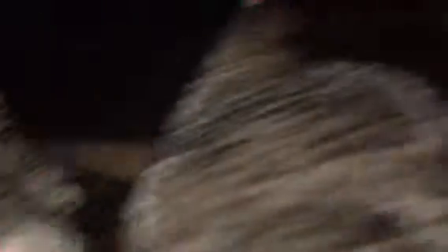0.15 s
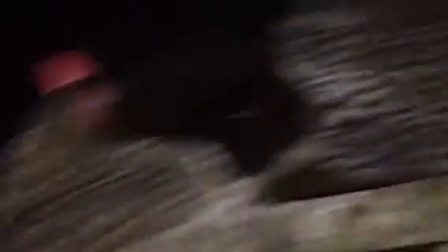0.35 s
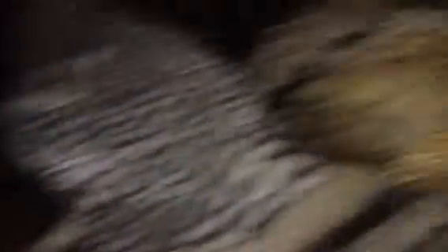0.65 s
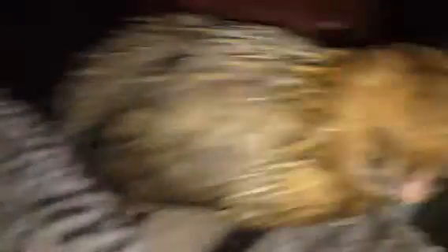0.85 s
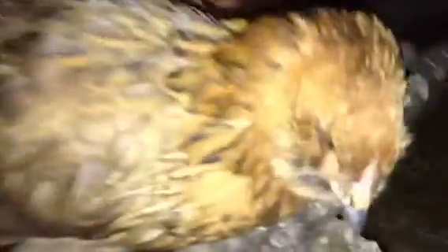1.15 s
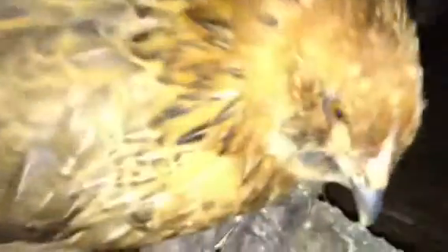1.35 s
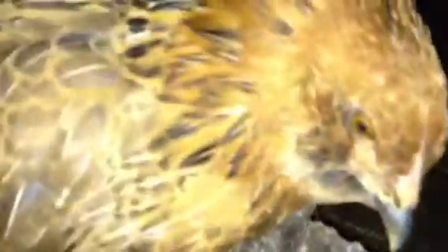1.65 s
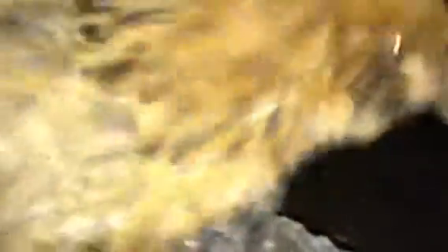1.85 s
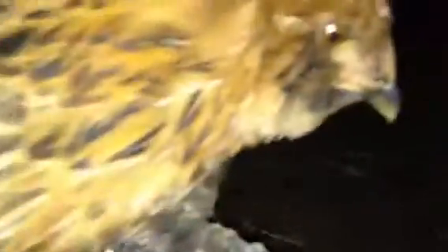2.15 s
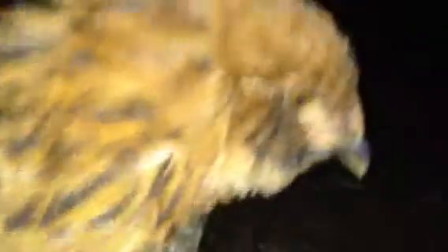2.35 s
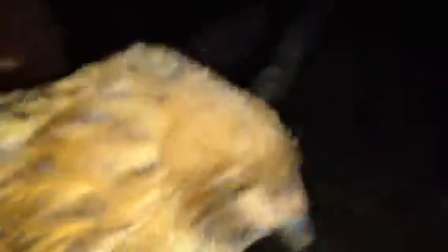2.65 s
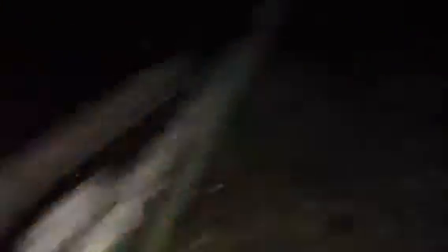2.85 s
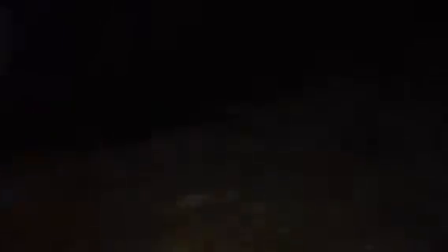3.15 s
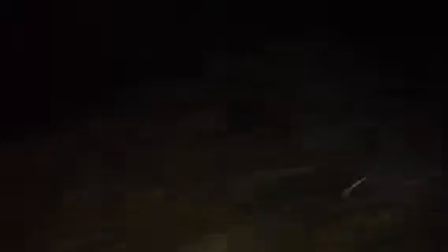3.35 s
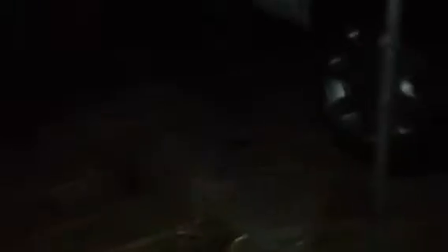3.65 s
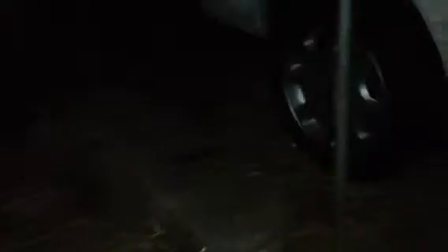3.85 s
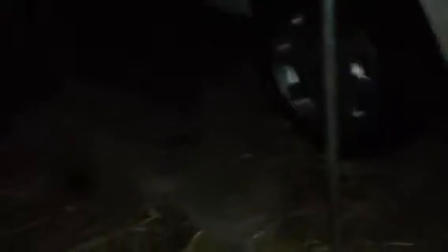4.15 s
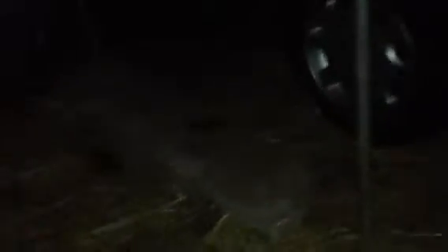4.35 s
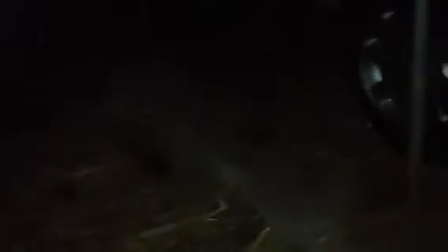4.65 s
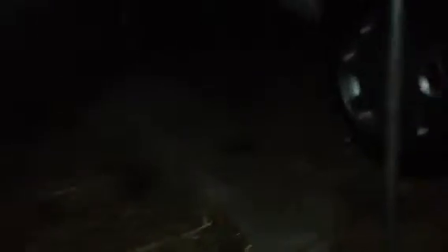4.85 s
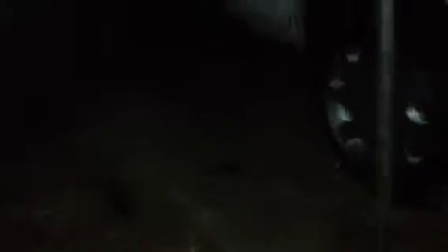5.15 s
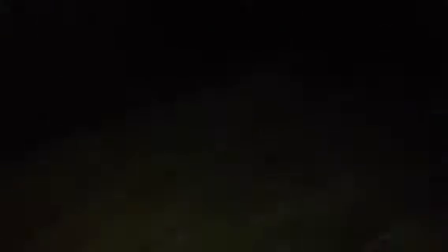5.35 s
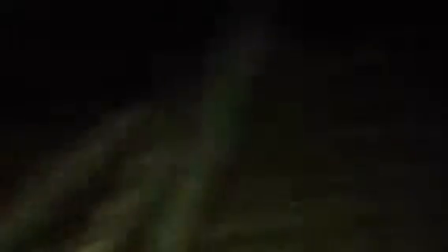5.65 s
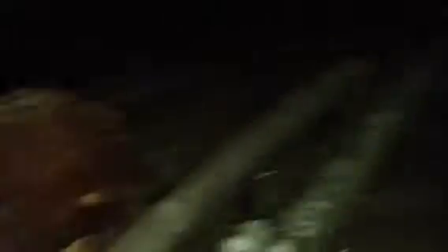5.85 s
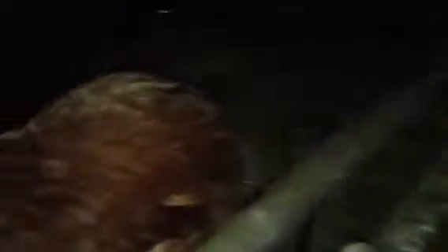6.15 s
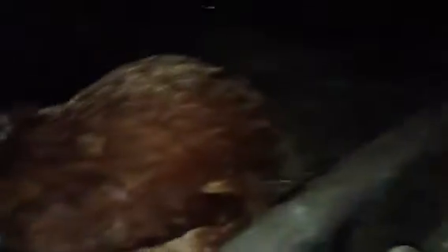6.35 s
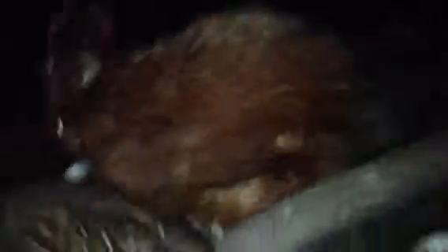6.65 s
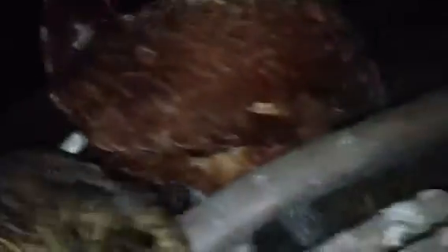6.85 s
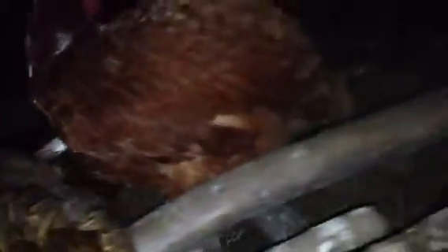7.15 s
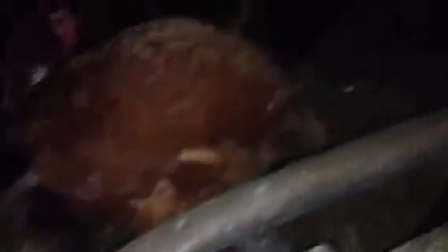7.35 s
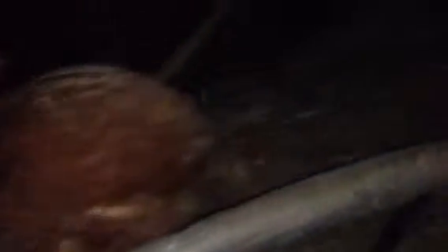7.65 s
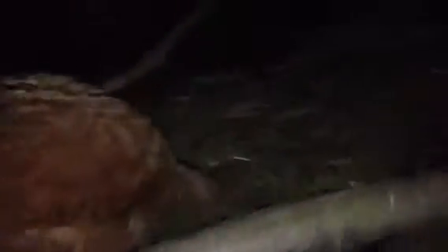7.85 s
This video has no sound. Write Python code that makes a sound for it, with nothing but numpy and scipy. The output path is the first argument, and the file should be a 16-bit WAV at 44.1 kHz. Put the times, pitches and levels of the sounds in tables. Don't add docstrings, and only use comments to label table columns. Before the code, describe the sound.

Outdoors at night, hundreds of small tree frogs whistle in an unbroken overlapping chorus, each a level low note then a rising high one. The closest frog whistles sharply at the start and about every two and a half seconds. Straw rustles and snaps beside the hand-held microphone, claws knock dully on a wooden perch, and a hen mutters very faintly under faint crickets.

```python
import sys
import numpy as np
from scipy import signal
from scipy.fft import rfft, irfft
from scipy.io import wavfile
from scipy.ndimage import uniform_filter1d

SR = 44100
rng = np.random.default_rng(int(sys.argv[2]) if len(sys.argv) > 2 else 0)


def materialize(psi):
    bounded = np.clip(np.atleast_2d(psi).T, -1, 1)
    quanta = np.round(bounded * 32767).astype(np.int16)
    wavfile.write(sys.argv[1], SR, quanta)


def volts_from_decibels(level):
    exponent = np.asarray(level, float) / 20
    return 10 ** exponent


N = 353266

LEAD_S = .259

# start_s, level_db, top_pitch_hz, echo_db, low_note_db
NEAR_CALLS = [
    (-.08, -26.5, 2936, -15, -45),
    (2.514, -34, 3066, -5.5, -46),
    (4.896, -28.5, 2986, -10, -33.5),
    (7.447, -33.5, 2994, -0.5, -35),
]


def evened(x):
    return x / np.sqrt(np.mean(x ** 2) + 1e-20)


def curve(rows):
    s, *columns = np.transpose(rows)
    return [np.interp(np.arange(N) / SR, s, c) for c in columns]


def coloured(x, points):
    hz = np.fft.rfftfreq(len(x), 1 / SR)
    f, level_db = np.transpose(points)
    gain = volts_from_decibels(np.interp(np.log(hz + 1), np.log(f), level_db))
    return irfft(rfft(x) * gain, len(x))


def add(mix, s, sound):
    at = round(s * SR)
    sound = sound[max(-at, 0):]
    part = mix[max(at, 0):][:len(sound)]
    part += sound[:len(part)]


def whistle(hz, swell, overtones):
    turn = 2 * np.pi * (np.cumsum(hz) / SR + rng.random())
    faint = sum(volts_from_decibels(db) * np.sin(k * turn) for k, db in overtones)
    return np.sqrt(2) * swell * (np.sin(turn) + faint)


def rising(db, top_hz, rise_hz, scoop_hz=60, slowing=.072, length=0.15, overtones=((3, -48),)):
    t = np.arange(0, length, 1 / SR)
    hz = top_hz - rise_hz * np.exp(-t / slowing) - scoop_hz * np.exp(-t / .003)
    swell = np.interp(t / length, [0, .05, .3, .8, 1], [0.37, 0.65, 1.2, 1.0, 0.041])
    return volts_from_decibels(db) * whistle(hz, swell, overtones)


def level(db, hz, sag=270, length=0.12, overtones=((2, -48),)):
    t = np.arange(0, length, 1 / SR)
    swell = np.interp(t / t[-1], [0, .1, .3, .85, 1], [0.27, 1.21, 0.95, 0.85, 0.18])
    return volts_from_decibels(db) * whistle(hz + 30 * np.exp(-t / 0.013) - sag * t, swell, overtones)


def grown(note, growth_db, span=(0, .65)):
    return note * volts_from_decibels(np.interp(np.linspace(0, 1, len(note)), span, [-growth_db, 0]))


def shrubs(x, t60, start):
    at = np.arange(round(start * SR), SR // 2, 22)
    sign = rng.choice([-1., 1.], len(at))
    taps = np.zeros(SR // 2 + 22)
    taps[at + rng.integers(0, 22, len(at))] = sign * volts_from_decibels(-60 * at / SR / t60)
    return signal.oaconvolve(x, taps / np.linalg.norm(taps))[:N]


def among_leaves(notes, direct_db, near_db, tail_db, count=4):
    direct, scattered = np.zeros(N), np.zeros((count, N))
    for k, (s, db, note) in enumerate(notes):
        nearness_db = np.clip(db + 43, 0, 9)
        add(direct, s, volts_from_decibels(direct_db) * note)
        add(scattered[k % count], s, volts_from_decibels(-nearness_db) * note)
    near_leaves = sum(shrubs(bush, .12, .001) for bush in scattered)
    far_leaves = shrubs(scattered.sum(0), 0.49, .02)
    return direct + volts_from_decibels(near_db) * near_leaves + volts_from_decibels(tail_db) * far_leaves


def night_air():
    # pitch_hz, level_db (per Hz)
    air_colour = [(30, -51), (70, -18), (140, 4.5), (220, 5), (400, 1), (1200, -5.5), (1780, 0),
                  (2050, -4.5), (3300, -24), (4000, -5), (4800, -9.5), (7500, -12.5), (10000, -46),
                  (15300, -9)]
    return volts_from_decibels(-68.5) * evened(coloured(rng.standard_normal(N), air_colour))


def crickets(count=9):
    out, t = np.zeros(N), np.arange(900) / SR
    for place in np.linspace(-1, 1, count):
        clicks = rng.random(N) < 70 / SR
        swell = np.exp(-t / 0.0083) * (1 - np.exp(-t / 0.00026))
        ring = np.sin(2 * np.pi * (5480 + 190 * place) * t) * swell
        out += volts_from_decibels(-5 * place ** 2) * signal.oaconvolve(clicks, ring)[:N]
    return volts_from_decibels(-66) * evened(out)


def far_chorus(count=420):
    # start_s, level_db
    far_effort = [(0, -40), (.13, -47), (.67, -46), (.91, -42), (1.05, -50.5), (1.61, -47), (2.3, -52),
                  (2.59, -44.5), (2.74, -51), (3.9, -48), (4.3, -48), (4.84, -45.5), (5.15, -51),
                  (6.1, -46.5), (6.69, -50), (7.09, -48), (7.4, -48), (8.3, -44.5)]
    # pitch_hz, level_db
    high_colour = [(1900, -35.5), (2150, -13), (2350, -7), (2550, -4.5), (2800, -6.5), (2950, -14),
                   (3100, -11.5), (3300, -27)]
    # pitch_hz, level_db
    low_colour = [(1200, -38), (1330, -9.5), (1450, -5), (1580, -12), (1660, -17), (1750, -45)]
    high, low = np.zeros((2, N))
    for when, pitch, size, other in rng.random((count, 4)):
        high_note = rising(-8 * size, 2500 + 640 * pitch, 450.3, overtones=[])
        low_note = level(-8 * size, 1340 + 280 * other, sag=800 * pitch - 200, overtones=[])
        add(high, 8.3 * when - .2, high_note)
        add(low, (8.3 * when + other) % 8.3 - .2, low_note)
    high_db = curve(far_effort)[0]
    low_db = curve([(s - LEAD_S, db - 4.5) for s, db in far_effort])[0]
    direct = volts_from_decibels(-6)
    high = evened(coloured(direct * high + shrubs(high, 0.38, 0.001972), high_colour))
    low = evened(coloured(direct * low + shrubs(low, 0.79, 0.001968), low_colour))
    return volts_from_decibels(high_db - 3.5) * high + volts_from_decibels(low_db - 3) * low


def shrub_frogs():
    # high_start_s, high_level_db, top_pitch_hz, low_level_db
    whole_calls = [(.303, -44.5, 2890, -46.5), (.365, -49.5, 2767, -58), (.717, -56, 2853, -51.5),
                   (.858, -49, 2744, -50), (1.135, -45, 2776, -52.5), (1.498, -49.5, 2877, -58),
                   (1.584, -55, 3080, -60), (1.626, -50.5, 2777, -56), (1.884, -51.5, 2915, -60),
                   (2.08, -53.5, 2712, -54.5), (2.919, -46.5, 2780, -55), (3.063, -48.5, 2762, -57),
                   (3.344, -50, 2836, -56), (3.646, -45.5, 2909, -46), (3.68, -46, 2777, -80),
                   (4.178, -42, 2739, -49.5), (4.512, -43.5, 2812, -55.5), (5.252, -47, 2860, -55),
                   (5.256, -53.5, 2706, -57), (5.62, -58, 2948, -52), (6.88, -55, 2763, -56),
                   (6.275, -49, 2772, -53.5), (6.369, -53.5, 2794, -73), (6.545, -47.5, 3015, -66),
                   (6.555, -41, 2730, -60), (6.95, -49, 2813, -55), (7.105, -45.5, 2857, -57),
                   (7.545, -48, 2972, -57), (7.825, -49, 2732, -48.5), (7.895, -47, 2715, -62)]
    # start_s, level_db, top_pitch_hz
    lone_high = [(0.062, -48, 2950), (.109, -51.5, 2830), (.305, -45.5, 2790), (0.72, -57, 2812),
                 (.864, -47.5, 2692), (1.441, -51, 2660), (0.92, -48, 2760), (1.251, -50, 2773),
                 (2, -51, 2826), (2.331, -50, 2800), (6.872, -52, 2720), (2.608, -46.5, 2750),
                 (2.886, -48.5, 3020), (3.41, -46.5, 2887), (3.669, -58, 2674), (3.8, -51, 2650),
                 (4.033, -50, 2760), (4.045, -51, 2840), (4.206, -35, 2720), (4.558, -50, 2800),
                 (7.658, -52.5, 2676), (5.497, -50.5, 2830), (5.77, -54, 3140), (5.768, -49, 2670),
                 (4.27, -58, 2680), (6.044, -47, 2910), (6.69, -46, 2800), (7.22, -49.5, 2900),
                 (7.154, -45, 2850), (7.85, -46, 2900)]
    # start_s, level_db, pitch_hz
    lone_low = [(0.62, -59, 1600), (.56, -47.5, 1460), (1.67, -54.5, 1601), (2, -64, 1600),
                (2.287, -51.5, 1480), (2.93, -61, 1707), (1, -62, 1546), (3.827, -53.5, 1368),
                (4.36, -56.5, 1507), (4.532, -51, 1617), (4.972, -52.5, 1573), (5.177, -54, 1544),
                (6.341, -48.5, 1525), (6.959, -60, 1488), (7.35, -52.5, 1390), (7.683, -57, 1582),
                (7.62, -49.5, 1430), (.14, -53.5, 1520), (.92, -57, 1420), (1.34, -57, 1600),
                (3.4, -60, 1600), (6, -56, 1390), (6.4, -56.5, 1570), (6.85, -54, 1500)]
    # start_s, level_db, top_pitch_hz
    small_males = [
        (0.8, -55.5, 3130),
        (0.898, -57, 3143),
        (1.916, -53.5, 3110),
        (2.2, -57.5, 3120),
        (3.185, -53.5, 3175),
        (4.68, -62, 3080),
        (6.09, -67, 3050),
        (6.09, -55.5, 3174),
        (7.299, -67, 3000),
    ]
    rise_hz = 558.9
    high = [(s, db, grown(rising(db, top_hz, rise_hz), 1)) for s, db, top_hz, *_ in whole_calls + lone_high]
    high += [(s, db, rising(db, top_hz, rise_hz, length=.13)) for s, db, top_hz in small_males]
    lows = [(s - LEAD_S, db, .528 * top_hz) for s, _, top_hz, db in whole_calls]
    lows += [(s - LEAD_S, db, 1478) for s, *_, db in NEAR_CALLS]
    low = [(s, db, level(db, hz, sag=rng.uniform(80, 320))) for s, db, hz in lone_low + lows]
    high = among_leaves(high, direct_db=-9.5, near_db=0, tail_db=-5)
    return high + among_leaves(low, direct_db=-.5, near_db=-4.5, tail_db=-10)


def swelling_frogs():
    # start_s, final_level_db, top_pitch_hz, length_s, growth_db
    hidden_notes = [
        (0.383, -37.5, 2843, 0.14, 13),
        (0.692, -52.5, 3130, .14, 4),
        (.855, -33.5, 2842, 0.126, 14),
        (4.83, -43, 3150, .14, 16),
        (5.567, -57.5, 3074, 0.17, 4),
        (7.824, -36, 2928, 0.16, 8),
    ]
    notes = []
    for s, db, top_hz, length, growth_db in hidden_notes:
        note = rising(db, top_hz, rise_hz=802, length=length)
        notes.append((s, db, grown(note, growth_db, span=(.38, .5))))
    return among_leaves(notes, direct_db=-4.5, near_db=2, tail_db=-3.5)


def reedy_frog():
    # start_s, level_db, pitch_hz
    reedy_note = (5.89, -44, 1550)
    s, db, hz = reedy_note
    out = np.zeros(N)
    note = level(db, hz, sag=-600, length=0.11, overtones=[(2, -14), (3, -30)])
    add(out, s, grown(note, 9.5, span=(0, .35)))
    return out + volts_from_decibels(-7) * shrubs(out, .15, 0.00401)


def rubbing():
    # peak_s, level_db, rise_s, fall_s
    rubs = [(.45, -69, 0.17, 0.17), (.98, -64, 0.196, 0.069), (1.09, -61.5, .04, 0.13),
            (1.25, -62, 0.049, 0.19), (1.43, -63.5, 0.049, 0.042), (1.61, -64.5, .13, 0.053),
            (1.72, -54, .03, 0.19), (1.93, -55.5, 0.0086, 0.13), (2.0, -54.5, 0.071, 0.22),
            (2.16, -57, .06, 0.075), (2.27, -55, .08, 0.035), (2.4, -59, 0.35, .4),
            (2.56, -52, 0.08, 0.062), (2.74, -58.5, 0.13, 0.025), (2.85, -57, 0.14, 0.07),
            (3.031, -51.5, 0.009, 0.054), (3.17, -67, 0.99, 0.57), (4.55, -67, 0.33, 0.11),
            (4.62, -55, 0.05, 0.24), (4.86, -61, 0.11, 0.74), (5.26, -56.5, 0.63, 0.78),
            (5.7, -77, 0.43, 0.66), (6.069, -57, 0.13, 0.054), (6.29, -65.5, 0.2, 0.059),
            (6.38, -63, 0.096, 0.15), (6.54, -58, 0.11, 0.2), (6.85, -71, .6, 0.96),
            (7.169, -55, 0.1, 0.15), (7.54, -61.5, 0.076, 0.031), (7.85, -57, 0.28, 0.29)]
    t = np.arange(N) / SR
    power = volts_from_decibels(-73.5) ** 2
    for s, db, rise, fall in rubs:
        away = np.maximum((s - t) / rise, (t - s) / fall)
        power = power + volts_from_decibels(db - 15.5 * away) ** 2
    clumps = coloured(rng.standard_normal(N), [(7, -30), (30, 0), (60, -30), (500, -90)])
    return np.sqrt(power) * volts_from_decibels(0.87 * evened(clumps))


def rustle():
    # pitch_hz, level_db (per Hz)
    straw_colour = [(50, -42), (200, -7), (1000, -7.5), (3300, -0.5), (4100, -2.5), (4800, -9.5),
                    (6200, -3), (8600, -1.5), (10200, -6.5), (14200, -3), (15500, -8)]
    size = volts_from_decibels(4.8 * np.minimum(rng.exponential(1, N), 4))
    grains = size * (rng.random(N) < 900 / SR) * rng.standard_normal(N)
    rub = rng.standard_normal(N) + 0.44 * evened(grains)
    return volts_from_decibels(2.0) * rubbing() * evened(coloured(rub, straw_colour))


def ticks():
    # start_s, level_db
    stalks = [(0.6748, -52), (1.0943, -50), (1.226, -52), (1.5348, -56), (1.5912, -52), (1.71, -46),
              (1.924, -47), (2.6892, -48), (3.3432, -52), (4.4222, -47), (5.4055, -44), (6.0176, -46),
              (6.2651, -51), (6.3323, -51), (6.8916, -53), (7.1166, -46), (7.61, -52)]
    out, t = np.zeros(N), np.arange(200) / SR
    for s, db in stalks:
        click = np.diff(rng.standard_normal(len(t)) * np.exp(-t / .0006))
        add(out, s, volts_from_decibels(db - 1.5) * click / abs(click).max())
    return out


def snaps():
    # start_s, level_db, body_db (near 4 kHz)
    straw_snaps = [(1.703, -41, -19), (2.835, -42, -26), (3.0263, -27.5, -10.5), (3.177, -41.5, -9),
                   (3.463, -43, -26), (4.247, -49, -33), (4.521, -45, -24), (4.5943, -41, -13),
                   (4.6227, -38, -28), (5.127, -39, -26), (5.2175, -38, -33), (5.341, -37, -9),
                   (5.482, -41, -17), (4.73, -42, -26), (5.5616, -43.5, 1), (5.6664, -38, -10),
                   (5.7614, -44, -26), (5.839, -42, -4), (6.2222, -46, -32), (6.587, -43.5, -1.5),
                   (6.769, -45, -8), (7.1591, -42, -29), (7.5386, -46, -16), (7.6859, -58, -14),
                   (7.9503, -40, -32)]
    out, t = np.zeros(N), np.arange(3000) / SR
    fade = 1 - (t / t[-1]) ** 2
    for s, db, body_db in straw_snaps:
        burst = rng.standard_normal(len(t)) * (np.exp(-t / 0.00053) + 0.16 * np.exp(-t / 0.039))
        colour = [(400, body_db - 30), (1200, body_db + 7.5), (4000, body_db + 13.0),
                  (6500, 4.0), (12000, -4.0), (15000, -11)]
        add(out, s, volts_from_decibels(db - 2.5) * fade * coloured(burst, colour))
    return out


def knocks():
    # start_s, blow_db, wood_pitch_hz
    claw_blows = [(.004, -56, 800), (1.054, -55, 536), (2.227, -57, 665), (3.025, -45.5, 1200),
                  (3.029, -45, 1110), (4.586, -53, 770), (4.621, -51, 870), (5.561, -65, 371),
                  (5.622, -53.5, 1070), (5.665, -48, 1110), (5.725, -51, 1090), (5.768, -54, 953),
                  (5.813, -46.5, 826), (5.837, -43, 790), (6.012, -51, 600), (6.236, -57, 1150),
                  (6.508, -49, 1210), (6.548, -53.5, 910), (6.586, -43.5, 960), (7.189, -53, 600),
                  (2.383, -60, 1100), (2.41, -59, 1000), (4.595, -51, 860), (5.8, -56, 1000),
                  (5.85, -52, 800), (6.025, -56, 600), (6.048, -54, 1102), (6.691, -62, 560)]
    out, t = np.zeros(N), np.arange(3000) / SR
    fade = 1 - (t / t[-1]) ** 2
    for s, db, hz in claw_blows:
        blow = rng.standard_normal(len(t)) * (np.exp(-t / 0.0015) + 0.22 * np.exp(-t / 0.033))
        blow[0] = 4
        b, a = signal.butter(N=2, Wn=[0.5 * hz, 2.56 * hz], btype="band", fs=SR)
        wood = signal.lfilter(b, a, blow)
        add(out, s, volts_from_decibels(db + 7) * fade * wood / abs(wood).max())
    out[:len(t)] += volts_from_decibels(-42.5) * np.sin(2 * np.pi * 817 * t) * np.exp(-t / 0.0082)
    return out


def hen_mutters():
    # time_s, level_db, pitch_hz
    mutters = [(0.429, -62.5, 220), (0.481, -83, 323), (1.584, -61.5, 221), (1.689, -64, 209),
               (1.921, -65, 218), (1.986, -60.5, 187), (2.174, -65, 172), (2.248, -65, 244),
               (2.371, -64, 201), (2.412, -65, 200), (2.517, -60, 206), (2.688, -63, 193),
               (2.802, -69, 236), (4.881, -66.5, 243), (5.166, -71, 292), (6.579, -64, 208),
               (6.629, -67, 215.2)]
    out, t = np.zeros(N), np.arange(0, .055, 1 / SR)
    swell = np.sin(np.pi * (t / t[-1]) ** 0.9) ** 2
    for s, db, hz in mutters:
        turn = 2 * np.pi * np.cumsum(hz * (1.1 - 3 * t)) / SR
        voice = np.sin(turn) + 0.076 * np.sin(2 * turn) + 0.13 * np.sin(3 * turn)
        add(out, s - .012, volts_from_decibels(db + 1.0) * swell * voice)
    return out


def hen_wheeze():
    # time_s, pitch_hz, level_db, flutter (0-1)
    breath = [
        (.17, 8050, -94, 0),
        (.21, 8650, -89, 0),
        (.245, 9200, -79, 0),
        (.28, 9480, -78, 0),
        (.35, 9450, -86, 0),
        (.37, 9700, -90, 0.1),
        (.4, 9880, -80, .3),
              (.44, 9500, -75.5, .7),
        (.5, 9100, -72.5, .5),
        (.55, 8750, -75, .3),
        (.585, 8250, -82, 0),
        (.66, 7960, -87, 0),
        (.715, 8150, -86, 0),
        (.745, 7940, -84.5, 0),
        (.77, 7650, -88, 0),
        (.79, 7600, -95, 0),
    ]
    # time_s, flutter_hz
    flutter_speed = [
        (.42, 470),
        (.56, 200),
    ]
    hz, level_db, flutter = curve(breath)
    flutter_turn = 2 * np.pi * np.cumsum(curve(flutter_speed)[0]) / SR
    turn = 2 * np.pi * np.cumsum(hz) / SR + 2.1 * flutter * np.sin(flutter_turn)
    return np.sqrt(2) * volts_from_decibels(level_db) * (level_db > -91) * np.sin(turn)


def near_frog():
    # length_s, growth_db, echo_delay_s, level_steps_after_s, step_db
    note_shapes = [
        (0.18, -3.5, 0.012, 0.1205, -12.5),
        (0.13, -1, .011, .12, 1),
        (.14, 6, 0.011, .1, -2.5),
        (0.154, 2.5, .013, 0.08, -7),
    ]
    out = np.zeros(N)
    for call, shape in zip(NEAR_CALLS, note_shapes):
        s, db, top_hz, echo_db, _ = call
        length, growth_db, echo_s, step_s, step_db = shape
        note = rising(db, top_hz, rise_hz=830, scoop_hz=253, slowing=.13, length=length,
                      overtones=[(3, -43.5), (4, -58)])
        after_step = np.arange(len(note)) / SR - step_s
        note = grown(note, growth_db) * volts_from_decibels(np.interp(after_step, [0, .008], [0, step_db]))
        note = note + volts_from_decibels(-15.5) * shrubs(note, 0.029, 0.002)[:len(note)]
        add(out, s, note)
        add(out, s + echo_s, volts_from_decibels(echo_db) * note)
    return out + volts_from_decibels(-9.5) * shrubs(out, 0.33, .015)


def scene():
    background = night_air() + crickets() + far_chorus()
    frogs = shrub_frogs() + swelling_frogs() + reedy_frog() + near_frog()
    roost = rustle() + ticks() + snaps() + knocks() + hen_mutters() + hen_wheeze()
    return (background + frogs + roost)[None]


def unmasked(x, below_db=16.5, up_db=63, down_db=110):
    hz, t, z = signal.stft(x, SR, "cosine", nperseg=2048, noverlap=1024)
    power = (abs(z[:1024]) ** 2).reshape(256, 4, -1).mean(1)
    bands_db = 10 * np.log10(power + 1e-20)
    octaves = np.log2(hz[2:1024:4, None] / hz[2:1024:4])
    reach_db = np.where(octaves > 0, up_db * octaves, -down_db * octaves)
    hidden_db = (bands_db[None] - reach_db[:, :, None]).max(1) - below_db
    lasting_db = uniform_filter1d(bands_db, size=3)[64:176]
    hidden_db[64:176][lasting_db < np.percentile(lasting_db, 1.5)] = 0
    z[:1024] *= np.repeat(bands_db > hidden_db, 4, axis=0)
    return signal.istft(z, SR, "cosine", nperseg=2048, noverlap=1024)[1][:N]


def band_limit(x):
    return signal.sosfilt(signal.butter(12, 15890, fs=SR, output="sos"), x)


def record(dry):
    # pitch_hz, level_db
    mic_colour = [(20, -4), (130, -1.5), (200, 0), (15250, 0), (15420, -60)]
    heard = coloured(np.pad(dry[0], (0, SR // 4)), mic_colour)[:N]
    return band_limit(unmasked(heard)[None])


dry = scene()
out = record(dry)
materialize(out)
```